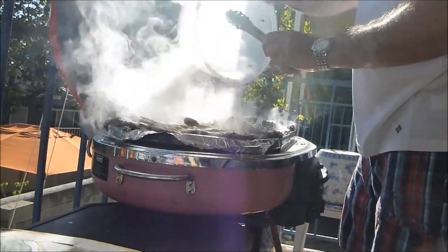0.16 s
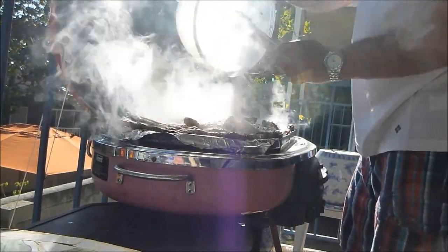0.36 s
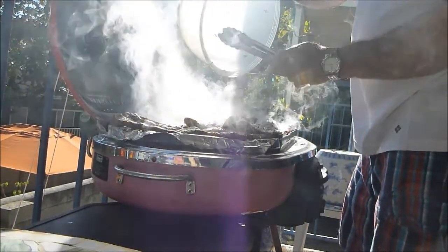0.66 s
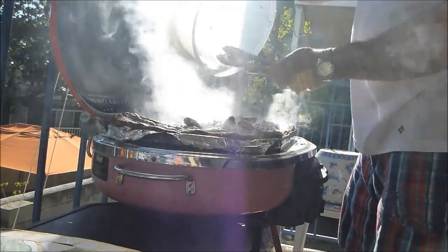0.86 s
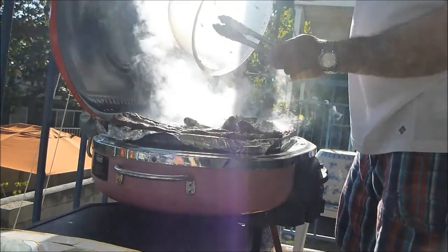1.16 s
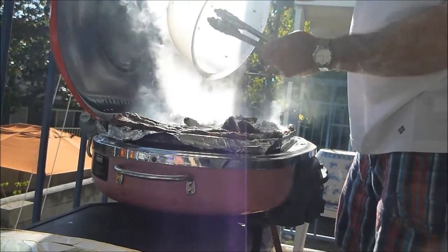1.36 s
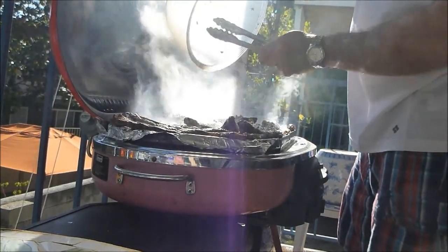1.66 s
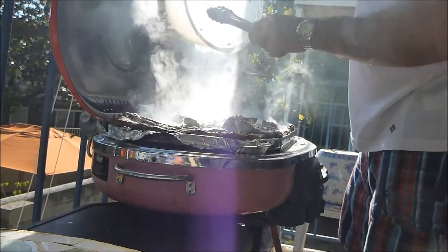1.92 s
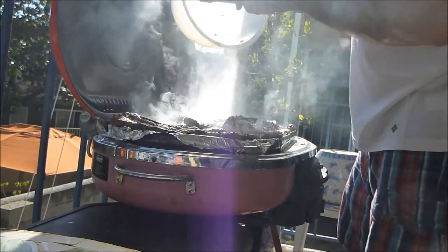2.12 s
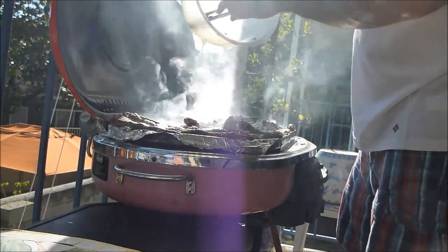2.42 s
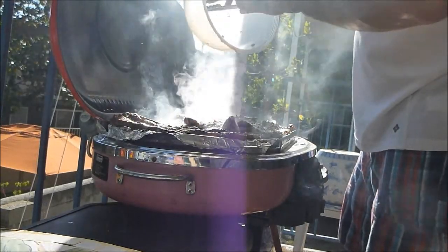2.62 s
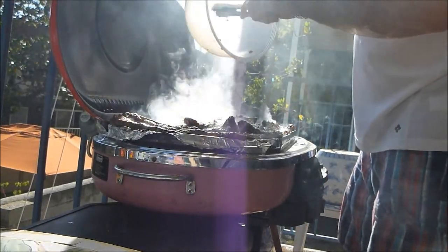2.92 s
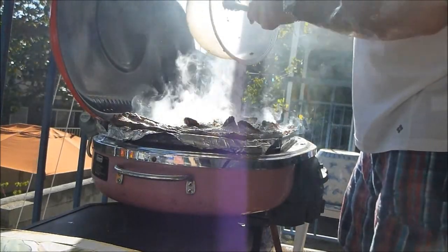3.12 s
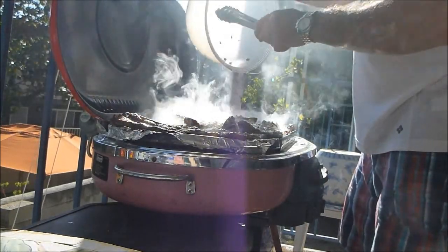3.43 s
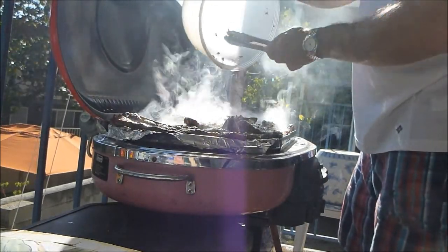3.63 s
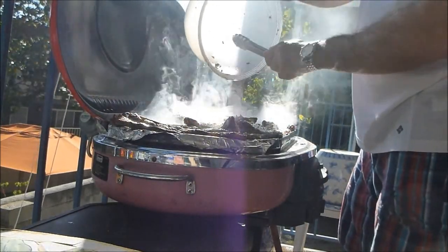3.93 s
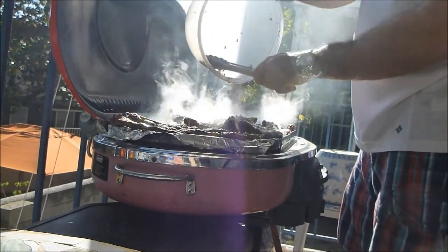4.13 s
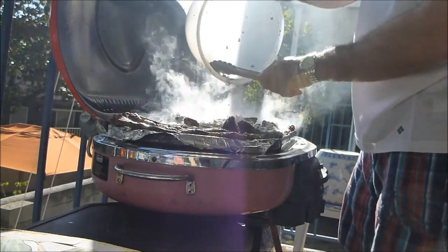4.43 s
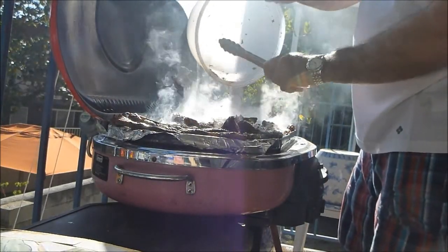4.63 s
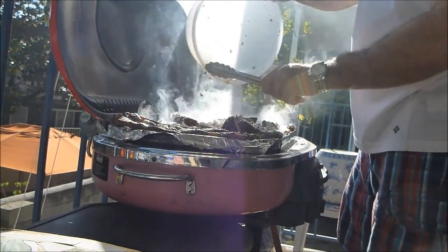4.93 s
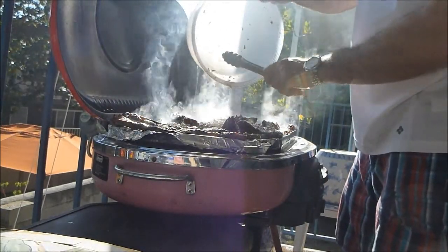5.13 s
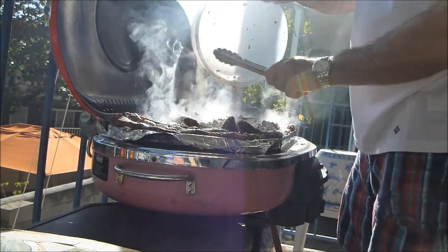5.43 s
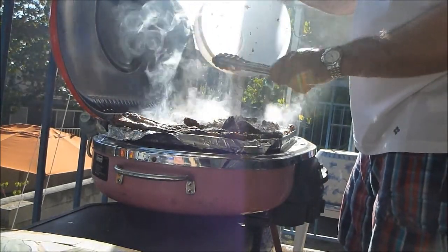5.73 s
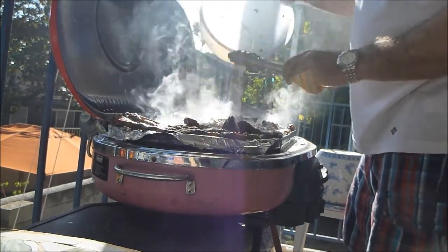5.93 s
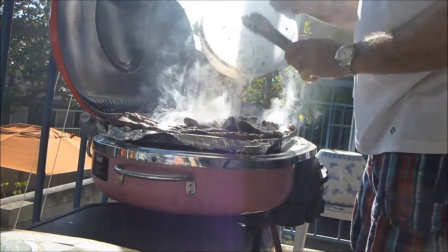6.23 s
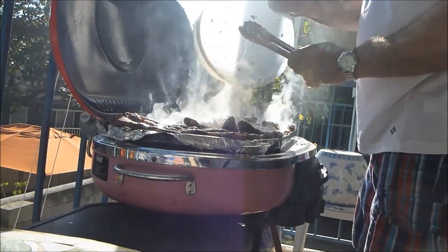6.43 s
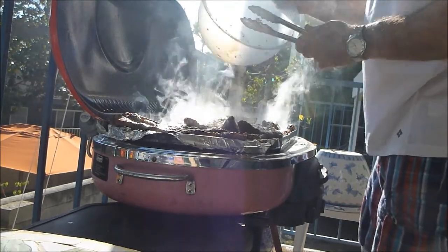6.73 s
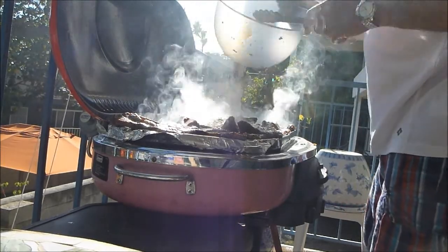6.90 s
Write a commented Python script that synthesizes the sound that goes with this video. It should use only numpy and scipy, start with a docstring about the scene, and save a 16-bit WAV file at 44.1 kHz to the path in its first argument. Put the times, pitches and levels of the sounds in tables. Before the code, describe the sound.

Fat sizzles steadily on a grill's foil for all seven seconds, over the low rumble of a distant town and a barely audible thin whistle. Close by, steel tongs clack loudly on a bowl at 0.6 seconds, their arms ringing on faintly. Four more clacks follow by 1.5 seconds. From 2 to 4.4 seconds, pieces of meat land in the bowl with soft, hollow thuds, mixed with thin ticks of the tongs closing. The tongs knock the bowl again at 4.3 and 4.7 seconds, tick at 5, and tap it lightly until about 5.7. Two loud clacks come at 6.3 and 6.5 seconds, then a last soft thud at 6.8. The knocks ring only briefly, with a very short echo from nearby terrace surfaces. After the loudest ones, the hiss dips slightly and creeps back.

```python
"""Tongs and bowl at a terrace grill

Close to one microphone, steel tongs clack on a bowl, meat thuds into it and the tong arms tick together.
The grill's open lid and nearby walls answer; fat hisses on foil, with a town rumbling in the distance.
The loudest blows turn the camera's gain down, so that the hiss ducks slightly and creeps back."""
import sys
import numpy as np
from scipy import signal
from scipy.fft import rfft, irfft, next_fast_len
from scipy.io import wavfile
from scipy.ndimage import map_coordinates

SR = 44100
rng = np.random.default_rng(int(sys.argv[2]) if len(sys.argv) > 2 else 0)


def inscribe(sig):
    """Save sig as 16-bit PCM at rate SR to the path in sys.argv[1].

    A 1-D sig is mono; a 2-D sig holds one channel per row.
    Samples are clipped to [-1, 1] before scaling.
    """
    pcm = np.round(np.clip(np.atleast_2d(sig).T, -1, 1) * 32767)
    wavfile.write(sys.argv[1], SR, pcm.astype(np.int16))


N = 311346

# bare steel on the bowl: start_s, level_db, place (0 wall, 1 rim), hardness_db_per_octave, low_hz, rim_hz
BOWL_CLACKS = [(0.5693, -15, 0.72, -0.74, 375, 1132), (0.8286, -23.5, 0.11, .8, 357, 1207),
               (0.839, -23.5, 0.58, -1, 376, 1185), (1.021, -20, .45, -1.35, 386, 1123),
               (1.2322, -20, 0.31, -.4, 605, 1182), (1.4881, -21.5, 0.043, .3, 367, 1120),
               (4.3305, -20.5, 0.72, -0.3, 377, 1238), (4.7496, -22, 0.57, -.7, 657, 1200),
               (4.8698, -35.5, 0.22, -1.2, 487, 1180), (4.889, -33, 0.8, 0.5, 296, 1150),
               (5.247, -35.5, 0, 0.7, 510, 1180), (5.3209, -30.5, 0.47, 1.3, 534, 1165),
               (5.5764, -27, 0.011, 1.3, 521, 1076), (5.657, -37.5, 0.63, 0, 520, 1160),
               (5.6833, -30, 0.46, 0.5, 380, 1195), (6.2841, -15.5, 0.98, 0.65, 970, 1100),
               (6.2913, -19.5, 0.83, -9, 760, 1116), (6.514, -16, 0.59, -1.14, 350, 1267)]
# meat landing in the bowl: start_s, level_db, pitch_hz, tong_click_db
MEAT_THUDS = [(2.278, -39, 403, -44.5), (2.4013, -29, 503, -43), (2.7523, -23.5, 415.6, -42.5),
              (2.7658, -27.5, 490, -42.5), (3.021, -23, 304, -36), (3.6186, -31, 395, -42.5),
              (3.9487, -26, 403, -35), (4.369, -29, 410, -37), (6.808, -30.5, 410, -51)]
# the bowl's modes: pitch_hz, level_db, t60_s
BOWL_MODES = [(188, -14, .1), (280, -10, .08), (360, -3, .15), (403, 1, .17), (492, -4, .08),
              (560, -4, .07), (648, -5, .07), (765, -5, .09), (955, -8, .05), (1098, -7, .15),
              (1204, -8, .16), (1305, -14, .1), (1464, -7, .09), (1632, -6, .1), (1810, -7, .07),
              (1950, -1, .06), (2213, -7, .07), (2410, -11, .06), (2686, -11, .06)]
# a blow's own low note, then its rim note: level_db, t60_s
BLOW_NOTES = [(3, .065), (2, .115)]
# how a blow on the wall drives the bowl: frequency_hz, gain_db
WALL_DRIVE = [(350, -1), (600, 5.5), (880, -12), (1150, -9.5), (1600, -6), (2500, -10), (3400, -9),
              (8000, -7.5), (14000, -5)]
# how a blow on the rim drives it: frequency_hz, gain_db
RIM_DRIVE = [(200, -6), (400, -18), (650, -7.5), (1120, 2), (1500, -8.5), (2050, -13.5), (2500, -10.5),
             (3400, -15)]
# how the tongs' click drives it through the meat: frequency_hz, gain_db
CUSHIONED_DRIVE = [(1100, -11), (1600, -5), (2300, -1), (3600, -2.5), (12000, 0.5)]
# contact noise on the bowl: frequency_hz, level_db
CRACK_SPECTRUM = [(40, -26), (100, -8), (180, -2), (400, 5), (700, 2.5), (1200, 0), (2200, 4.5),
                  (3600, -5.5), (5200, -4), (7500, -11.5), (10000, -13), (15500, -18.5)]
# the tong arms meeting: start_s, level_db, brightness_db_per_octave
TONG_TICKS = [(0.852, -28, 0), (2.0226, -24, 5.5), (2.08, -29, 14), (2.391, -20.5, 8), (3.1732, -22, 4),
              (3.9514, -19.5, 6), (3.9834, -31, 8), (5.022, -23.5, 8)]
# the steel's short modes in a tick: pitch_hz, level_db, t60_s
STEEL_MODES = [(3350, -6, .03), (5750, -8, .03), (6900, -11, .025), (10300, -13, .02), (13200, -21, .015)]
# contact noise between the arms: frequency_hz, level_db
SNAP_SPECTRUM = [(300, 5), (2000, 14.5), (5500, 3), (10000, -2), (15500, -14)]
# the two arms ringing freely: pitch_hz, level_db, t60_s
ARM_MODES = [(1653, 0, 1.7), (1696, -4, 1.7)]
# reflections off lid, floor and walls: delay_s, relative_gain
NEAR_ECHOES = [(.0035, 0.49), (0.0118, 0.52), (0.029, .12)]
# the terrace's diffuse tail: frequency_hz, t60_s
TERRACE_DECAY = [(150, 0.3), (500, 0.11), (1300, 0.19), (4000, 0.17), (14000, 0.17)]
# fat on hot foil: frequency_hz, level_db
SIZZLE_SPECTRUM = [(300, -40), (1200, 7), (2300, 8), (3700, 4.5), (5200, 4), (7000, 0.5), (10000, 0.5),
                   (13000, -4), (15800, -5)]
# the town from a distance: frequency_hz, level_db
TOWN_SPECTRUM = [(20, -25), (40, -20), (70, -10.5), (125, -0.5), (200, 0.5), (330, 0.5), (550, -3),
                 (900, -7), (1500, -13), (3000, -47), (8000, -39)]
# the background's slow drift: time_s, town_db, sizzle_db
BACKGROUND_LEVELS = [(0, -41, -46), (.5, -41, -45.5), (2.4, -42.5, -46.5), (4, -40.5, -44),
                     (7.06, -41, -45)]
# the camera's narrow dips: centre_hz, width_hz
CAMERA_NOTCHES = [(2915, 130), (11720, 1300)]

DRIVE_HZ = np.geomspace(20, SR / 2, num=128)  # where a blow's drive is evaluated


def clacks(bright_above_hz=960):
    """Steel on the bowl: a broad knock on the wall, more ring towards the rim, brighter when harder."""
    track = np.zeros(N)
    octaves_up = np.maximum(np.log2(DRIVE_HZ / bright_above_hz), 0)
    wall, rim = along(WALL_DRIVE, DRIVE_HZ), along(RIM_DRIVE, DRIVE_HZ)
    for start_s, db, place, hardness, low_hz, rim_hz in BOWL_CLACKS:
        drive_db = db + (1 - place) * wall + place * rim + hardness * octaves_up
        modes = gripped_bowl((low_hz, *BLOW_NOTES[0]), (rim_hz, *BLOW_NOTES[1]))
        add(track, start_s, blow(modes, drive_db, ring_db=3, crack_db=19, crack_t60_s=0.042))
    return track


def thuds(plateau_ratio=1.104, falloff_db_per_octave=19, t60_share=0.88):
    """Meat lands softly, driving the modes near one low note and damping the bowl; the tongs click."""
    track = np.zeros(N)
    for start_s, db, pitch_hz, click_db in MEAT_THUDS:
        octaves_off = np.maximum(np.abs(np.log2(DRIVE_HZ / pitch_hz)) - np.log2(plateau_ratio), 0)
        landing_db = db - falloff_db_per_octave * octaves_off
        drive_db = np.maximum(landing_db, click_db + along(CUSHIONED_DRIVE, DRIVE_HZ))
        modes = gripped_bowl((pitch_hz, *BLOW_NOTES[0])) * [1, 1, t60_share]
        add(track, start_s, blow(modes, drive_db, ring_db=4.5, crack_db=16, crack_t60_s=0.062))
    return track


def gripped_bowl(*notes, detune=0.0051):
    """The bowl's modes, slightly shifted by the grip, joined by the blow's own notes."""
    hz, db, t60 = np.transpose(BOWL_MODES)
    shifted_hz = hz * (1 + detune * rng.standard_normal(len(hz)))
    return np.vstack([np.column_stack([shifted_hz, db, t60]), *notes])


def blow(modes, drive_db, ring_db, crack_db, crack_t60_s, impact_db=18, bass_hz=140):
    """One contact with the bowl, heard on the terrace: ring and crack, both shaped by the drive."""
    t = np.arange(SR // 4) / SR
    drive = np.column_stack([DRIVE_HZ, drive_db])
    body = ring(modes, along(drive, modes[:, 0]) + ring_db, t)
    # the steel edge strikes once, then chatters briefly on the surface
    contact = rng.standard_normal(len(t)) * decay(t, crack_t60_s)
    contact[0] = amp(impact_db)
    crack = amp(crack_db) * causal(contact, CRACK_SPECTRUM, drive)
    # a small bowl radiates hardly any bass
    low_cut = signal.butter(2, bass_hz, "highpass", fs=SR, output="sos")
    return terrace(signal.sosfilt(low_cut, body + crack), wet_db=-9, echo_db=-5)


def ring(modes, drive_db, t):
    """Struck modes swell within a cycle and die away, with new strengths and phases at each contact."""
    hz, db, t60 = np.transpose(modes)
    gains = amp(db + drive_db + rng.standard_normal(len(hz)))
    lag_s = rng.uniform(.002, .004)  # modes close in pitch start in step, others do not
    waves = np.sin(2 * np.pi * np.outer(hz, t + lag_s))
    swell = 1 - np.exp(-np.pi * np.outer(hz, t))
    return gains @ (waves * swell * decay(t, t60[:, None]))


def ticks(snap_db=-6, snap_t60_s=0.025):
    """The thin steel arms snap together with a barely ringing tick."""
    track, t = np.zeros(N), np.arange(SR // 8) / SR
    for start_s, db, brightness in TONG_TICKS:
        contact = rng.standard_normal(len(t)) * decay(t, snap_t60_s)
        snap = amp(snap_db) * causal(contact, SNAP_SPECTRUM)
        steel = ring(STEEL_MODES, drive_db=-2, t=t)
        tick = causal(snap + steel, [(2000, -2 * brightness), (16000, brightness)])
        add(track, start_s, amp(db) * terrace(tick, wet_db=-5, echo_db=-3))
    return track


def singing_arms(drive_db=-42.5):
    """After the first clack the two free arms sing on faintly, slightly out of tune with each other."""
    track, t = np.zeros(N), np.arange(2 * SR) / SR
    add(track, BOWL_CLACKS[0][0], ring(ARM_MODES, drive_db, t))
    return track


def terrace(sound, wet_db, echo_db, build_s=0.014, delay_spread=0.021):
    """Near surfaces send back a few echoes, shifting as the hands move, and a short diffuse tail."""
    hz, t, noise = signal.stft(rng.standard_normal(SR // 3), SR, nperseg=256)
    _, tail = signal.istft(noise * decay(t, along(TERRACE_DECAY, hz)[:, None]), SR, nperseg=256)
    tail *= 1 - np.exp(-np.arange(len(tail)) / SR / build_s)
    response = amp(wet_db) * tail / np.linalg.norm(tail)
    response[0] += 1  # the direct path to the microphone
    # small surfaces throw back little bass
    bounce = causal(signal.unit_impulse(256), [(300, -12), (1200, 0)])
    for delay_s, gain in NEAR_ECHOES:
        arrival_s = delay_s * (1 + delay_spread * rng.standard_normal())
        add(response, arrival_s, amp(echo_db) * gain * bounce)
    return signal.fftconvolve(sound, response)


def sizzle(spit_db=-9, spits_per_s=2000, spread_db=2.5):
    """Fat fizzes on the grill's foil: a hiss mixed with countless tiny bursts."""
    time_s, _, sizzle_db = np.transpose(BACKGROUND_LEVELS)
    level_db = np.interp(np.arange(N) / SR, time_s, sizzle_db)
    spits = (rng.random(N) < spits_per_s / SR) * rng.standard_normal(N)
    spits *= amp(spread_db * rng.standard_normal(N))
    fizz = coloured(rng.standard_normal(N) + amp(spit_db) * unit(spits), SIZZLE_SPECTRUM)
    return unit(fizz) * amp(level_db + 0.34 * wobble(15))


def town():
    """Far behind the terrace the town rumbles, its level barely wavering."""
    time_s, town_db, _ = np.transpose(BACKGROUND_LEVELS)
    level_db = np.interp(np.arange(N) / SR, time_s, town_db)
    rumble = coloured(rng.standard_normal(N), TOWN_SPECTRUM)
    return unit(rumble) * amp(level_db + 0.26 * wobble(4.72))


def whine(pitch_hz=7885, level_db=-64):
    """A faint, thin whistle holds one pitch in the background."""
    return amp(level_db + 1.5 * wobble(2.8)) * np.sin(2 * np.pi * pitch_hz * np.arange(N) / SR)


def gain_control(x, threshold_db=-21.5, max_cut_db=2.5, recover_db_per_s=1.5):
    """A loud blow turns the camera's gain down quickly; it creeps back over a second or so."""
    level_db = 10 * np.log10(lagged(x ** 2, lag_s=0.0083) + 1e-20)
    wanted_cut_db = np.clip(level_db - threshold_db, 0, max_cut_db)
    recovery_db = recover_db_per_s * np.arange(N) / SR
    held_cut_db = np.maximum.accumulate(wanted_cut_db + recovery_db) - recovery_db
    return x * amp(-lagged(held_cut_db, lag_s=0.034))


def amp(db):
    """Decibels to gain."""
    return 10 ** (np.asarray(db) / 20)


def unit(x):
    """x at rms 1."""
    return x / np.sqrt(np.mean(x ** 2) + 1e-20)


def decay(t, t60_s):
    """An envelope that falls 60 dB in t60_s."""
    return np.exp(-np.log(1000) * t / t60_s)


def along(points, hz):
    """Rows of frequency_hz, value, interpolated on a log frequency axis."""
    point_hz, values = np.transpose(points)
    return np.interp(np.log(hz + 1), np.log(point_hz + 1), values)


def wobble(knots_per_s):
    """A smooth random curve."""
    knots = rng.standard_normal(int(N * knots_per_s / SR) + 4)
    return map_coordinates(knots, [np.arange(N) * knots_per_s / SR])


def lagged(x, lag_s):
    """x followed with a first-order lag."""
    keep = np.exp(-1 / (lag_s * SR))
    return signal.lfilter([1 - keep], [1, -keep], x)


def filtered(x, response):
    """x through a gain given as a function of frequency."""
    size = next_fast_len(len(x) + SR // 8)
    hz = np.fft.rfftfreq(size, 1 / SR)
    return irfft(rfft(x, size) * response(hz), size)[:len(x)]


def coloured(x, spectrum):
    """x shaped by rows of frequency_hz, gain_db."""
    return filtered(x, lambda hz: amp(along(spectrum, hz)))


def causal(x, *spectra):
    """x shaped by spectra of frequency_hz, gain_db at minimum phase, so that attacks stay sharp."""
    size = 2 * len(x)
    hz = np.fft.rfftfreq(size, 1 / SR)
    gain_db = sum(along(points, hz) for points in spectra)
    cepstrum = irfft(np.log(amp(gain_db)), size)
    cepstrum[1:size // 2] *= 2
    cepstrum[size // 2 + 1:] = 0
    return irfft(rfft(x, size) * np.exp(rfft(cepstrum)), size)[:len(x)]


def add(track, start_s, sound):
    """Mix a sound into the track."""
    part = track[max(round(start_s * SR), 0):][:len(sound)]
    part += sound[:len(part)]


def scene():
    """One microphone: bowl and tongs in front, the grill under them, the town far behind."""
    bowl = clacks() + thuds()
    tongs = ticks() + singing_arms()
    background = sizzle() + town() + whine()
    return (bowl + tongs + background)[None]


def record(dry):
    """The camera rides its gain, rounds off peaks, notches two narrow bands and cuts the top treble."""
    def response(hz, top_hz=15950):
        dips = [(centre ** 2 - hz ** 2) / (centre ** 2 - hz ** 2 + 1j * hz * width)
                for centre, width in CAMERA_NOTCHES]
        return np.prod(dips, axis=0) / (1 + (hz / top_hz) ** 120)

    ducked = gain_control(dry[0])
    rounded = ducked / (1 + ducked ** 4) ** (1 / 4)
    return filtered(rounded, response)[None]


dry = scene()
out = record(dry)
inscribe(out)
```